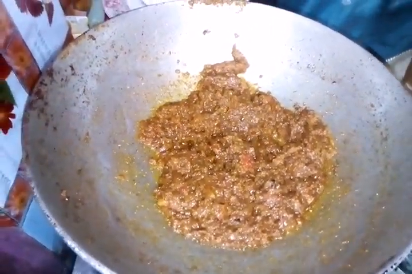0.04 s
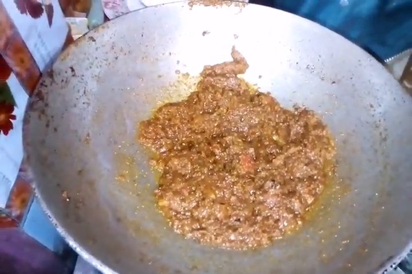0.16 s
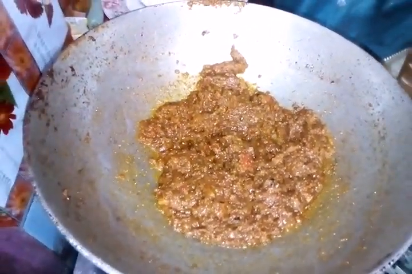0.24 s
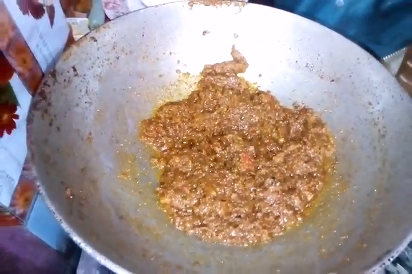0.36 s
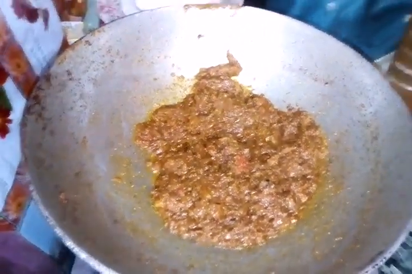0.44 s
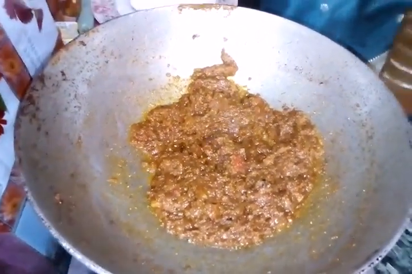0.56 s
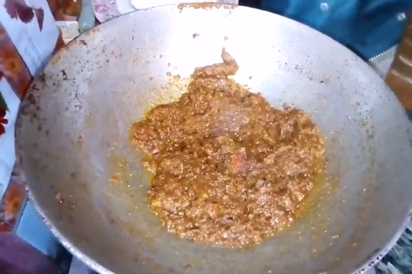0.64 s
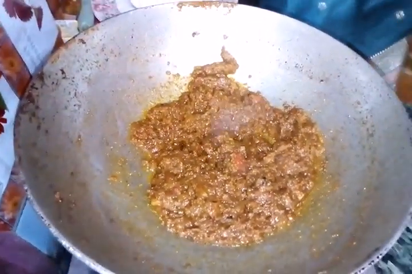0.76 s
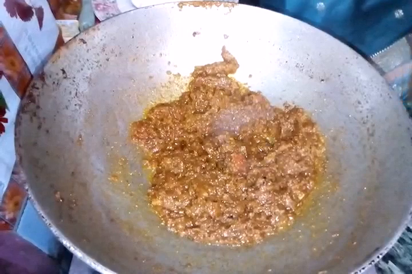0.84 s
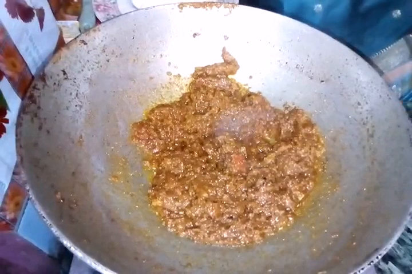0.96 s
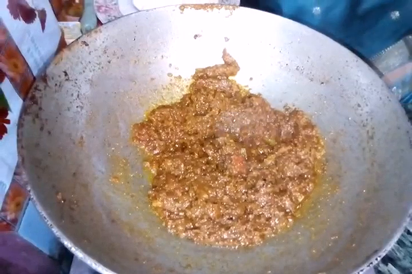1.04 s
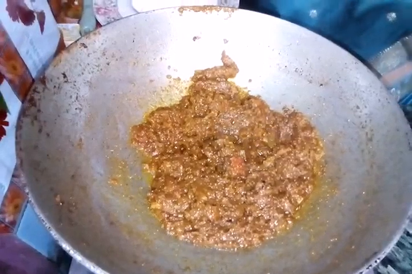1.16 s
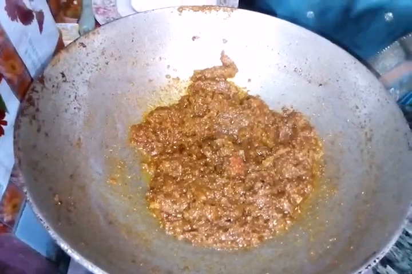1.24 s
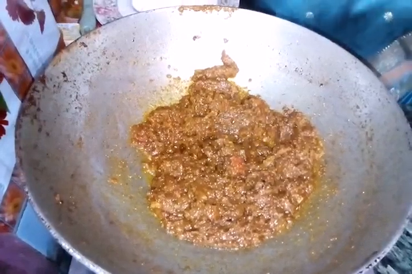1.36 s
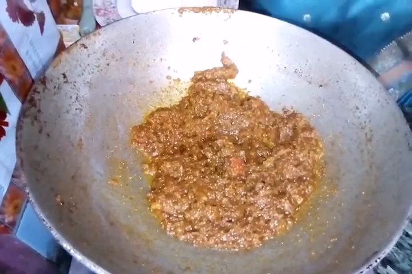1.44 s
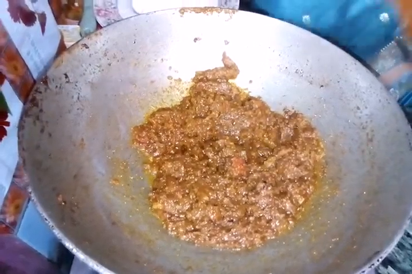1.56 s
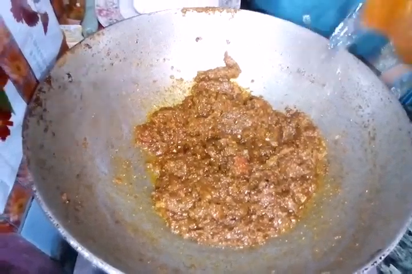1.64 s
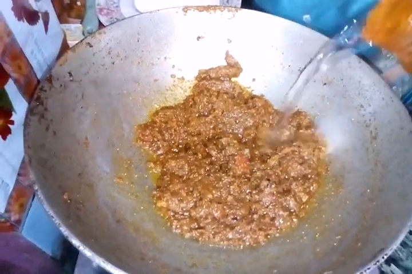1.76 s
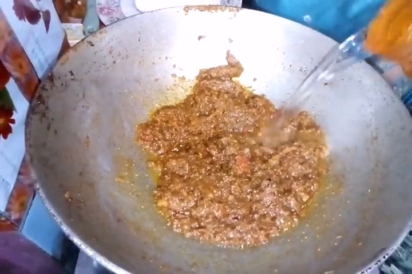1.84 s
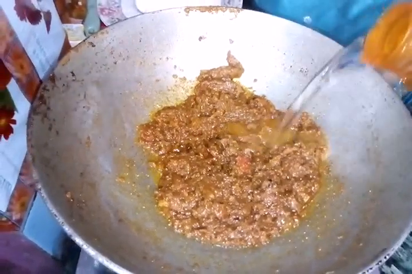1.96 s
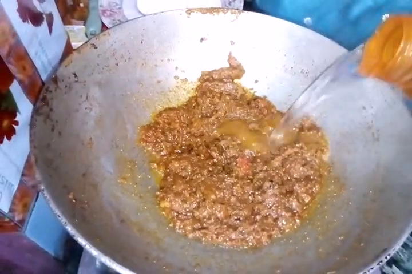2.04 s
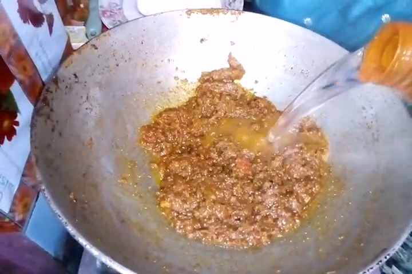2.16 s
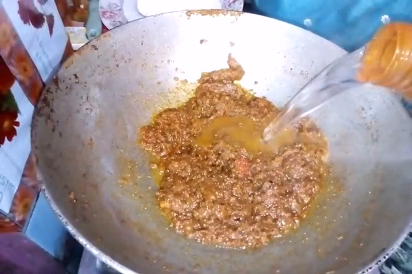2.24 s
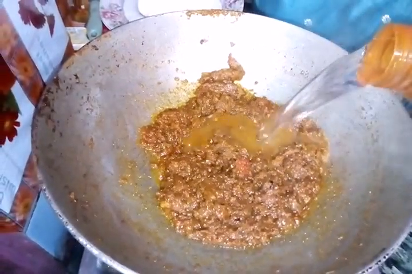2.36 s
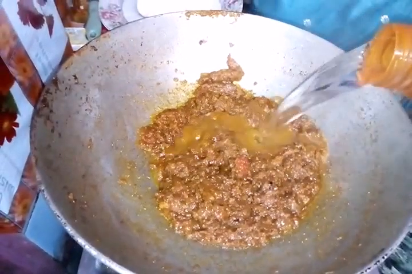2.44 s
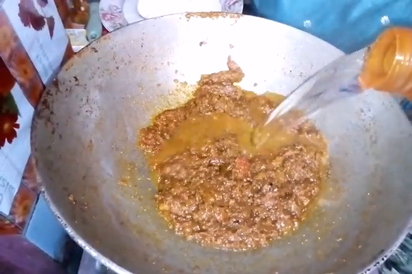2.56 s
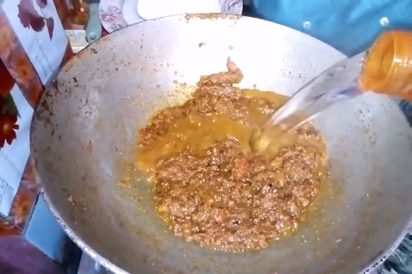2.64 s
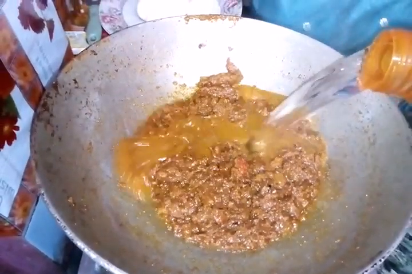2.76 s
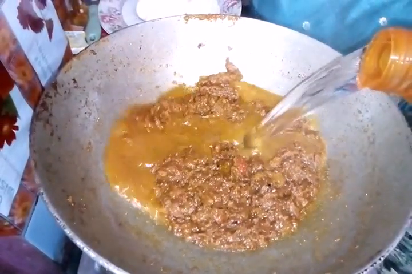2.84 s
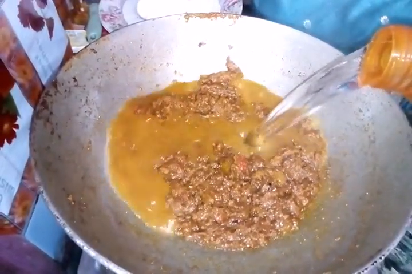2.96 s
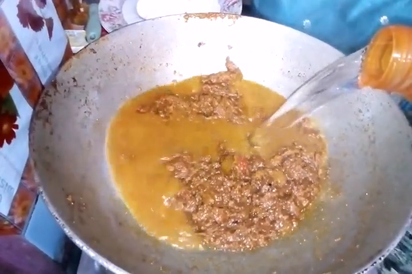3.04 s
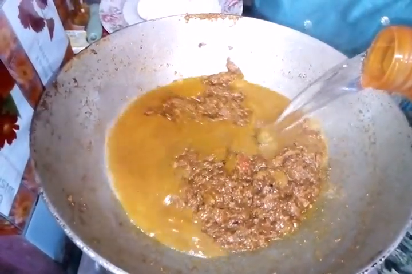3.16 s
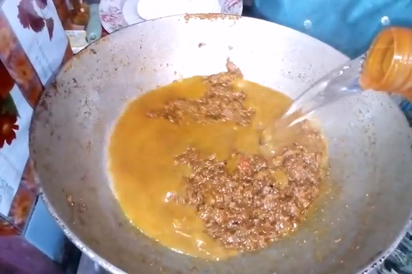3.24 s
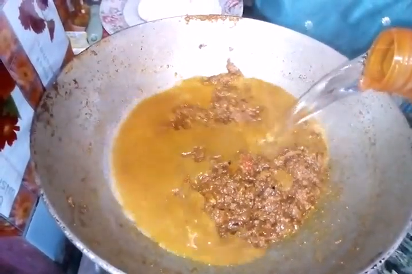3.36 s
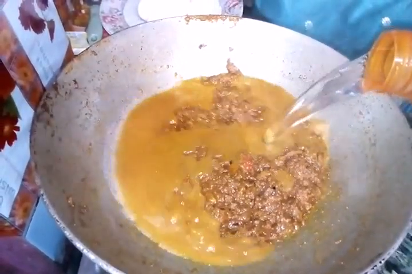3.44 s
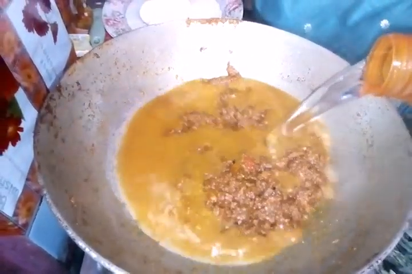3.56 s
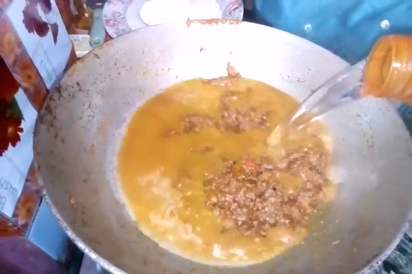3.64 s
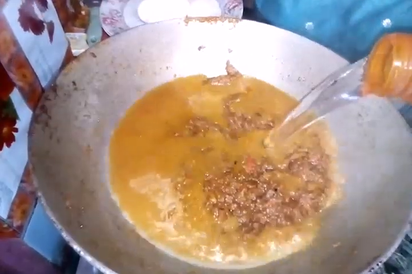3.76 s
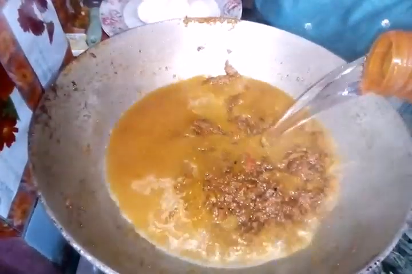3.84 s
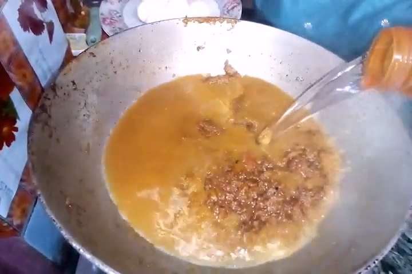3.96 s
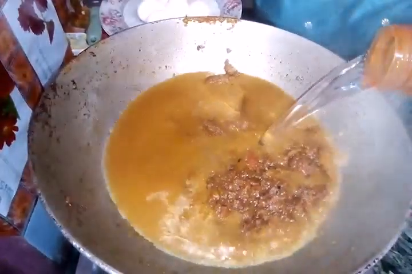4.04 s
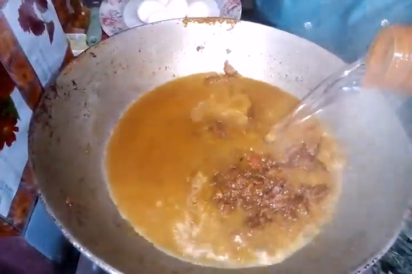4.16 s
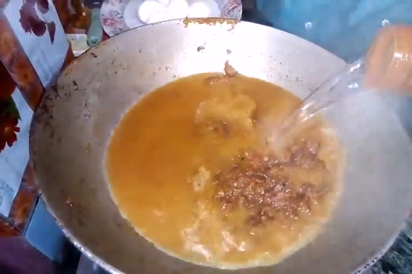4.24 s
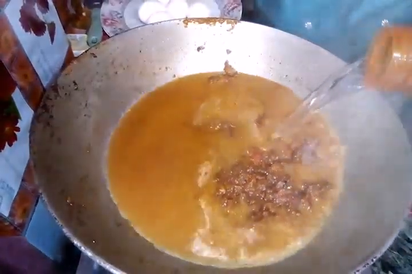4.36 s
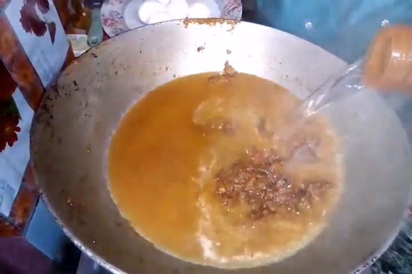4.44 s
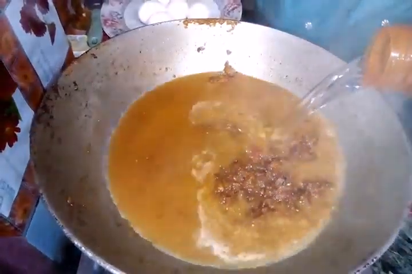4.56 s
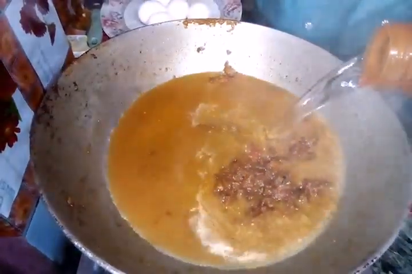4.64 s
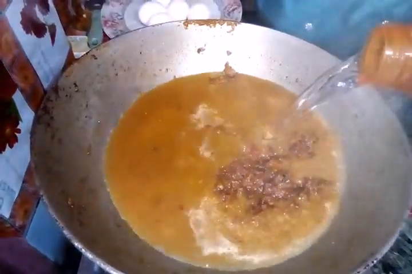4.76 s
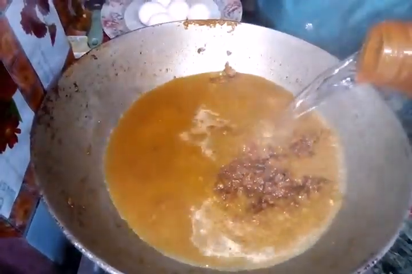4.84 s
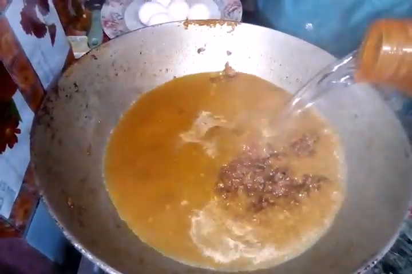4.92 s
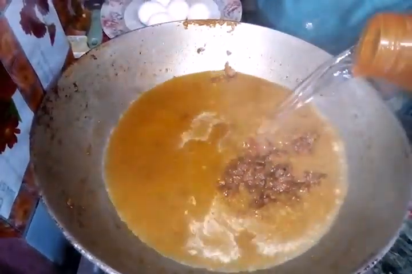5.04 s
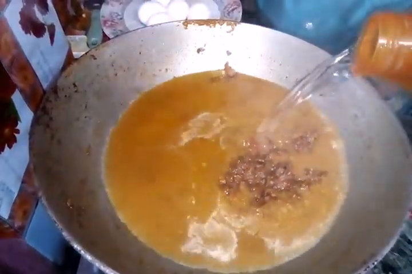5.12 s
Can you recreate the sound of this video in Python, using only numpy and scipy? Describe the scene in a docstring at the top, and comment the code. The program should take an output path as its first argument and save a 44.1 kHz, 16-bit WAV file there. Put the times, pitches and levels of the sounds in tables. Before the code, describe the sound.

Quiet oily frying with sharp little snaps over a faint gas flame, suddenly swamped by loud steaming hiss as water streams in.

```python
"""Water streams into a hot wide steel pan and flashes to steam: a loud dense hiss that deepens as the pool
boils. Before it, spice paste fries quietly: countless bursts of steam in the oil, each a short ring, a few with
a pop. Below lies the gas flame, low noise in narrow bands that swell and fade; under a loud hiss the low bands
dip to silence more often. Place: a kitchen whose near walls and hob add a short tail to the fine bursts; the
pan's bowl echoes the pops. At the microphone everything above 15.5 kHz is cut steeply."""
import sys
import numpy as np
from scipy import signal
from scipy.fft import rfft, irfft
from scipy.io import wavfile

SR = 44100
rng = np.random.default_rng(int(sys.argv[2]) if len(sys.argv) > 2 else 0)


def wav_record(signal):
    """Record a signal, one row per channel, as 16-bit PCM in the file named by sys.argv[1]."""
    frames = np.transpose(np.atleast_2d(signal))
    bounded = np.clip(frames, -1, 1)
    # unit amplitude maps onto the largest positive 16-bit level
    quanta = np.round(bounded * 32767).astype(np.int16)
    wavfile.write(sys.argv[1], SR, quanta)


N = 228743   # samples
TIME_S = np.arange(N) / SR


def from_db(db):
    """Amplitude gain of a level in dB."""
    return 10 ** (np.asarray(db) / 20)


def rms_one(x):
    """Scale to an RMS of 1."""
    return x / np.sqrt(np.mean(x ** 2) + 1e-20)


def in_time(rows):
    """Columns of dB as gains over time; silent outside the table."""
    s, *columns = np.transpose(rows)
    return [from_db(np.interp(TIME_S, s, column, left=-200, right=-200)) for column in columns]


def drift(rate_hz):
    """Slow chance: noise through a double one-pole low-pass, spread 1."""
    r = np.exp(-2 * np.pi * rate_hz / SR)
    noise = rng.standard_normal(N + SR)
    settled = signal.lfilter([1], [1, -2 * r, r * r], noise)[SR:]
    return rms_one(settled)


def colour(x, spectrum):
    """Causal (minimum-phase) filter with the given dB per Hz, made by folding the cepstrum."""
    hz, db = np.transpose(spectrum)
    grid_hz = np.maximum(np.fft.rfftfreq(4096, 1 / SR), 1)
    log_gain = np.interp(np.log(grid_hz), np.log(hz), db) * np.log(10) / 20
    cepstrum = irfft(log_gain)
    cepstrum[1:2048] *= 2
    cepstrum[2049:] = 0
    impulse_response = irfft(np.exp(rfft(cepstrum)))
    return signal.fftconvolve(x, impulse_response)[:N]


def ring(clicks, hz, cycles):
    """A vapour pocket rings as a resonance that falls 60 dB in the given number of cycles."""
    r = from_db(-60 * hz / (cycles * SR))
    w = 2 * np.pi * hz / SR
    return signal.lfilter([1, 0, -1], [1, -2 * r * np.cos(w), r * r], clicks + 1e-18)


KITCHEN_T60_S, KITCHEN_DB = 0.08, -0.5   # decay time; energy of the tail against the direct sound


def kitchen(x):
    """Near walls and hob return a short dense tail: decaying noise that starts after 2 ms."""
    t = np.arange(SR // 4) / SR
    tail = rng.standard_normal(len(t)) * from_db(-60 * t / KITCHEN_T60_S) * (t > .002)
    tail = tail / np.sqrt(np.sum(tail ** 2))
    return x + from_db(KITCHEN_DB) * signal.fftconvolve(x, tail)[:N]


def bursts(per_s, spread_db, clump_db, cycles, low_hz, high_hz, count=20):
    """Random ringing bursts of uneven size in clumps; each of six spots in the pan has its own room tail."""
    sizes = from_db(spread_db * np.minimum(rng.exponential(1, N), 4)) * rng.choice([-1, 1], N)
    surge = from_db(clump_db * (drift(66) + drift(8.0)))
    happens = rng.random(N) < np.minimum(per_s / SR, .9)
    clicks = sizes * surge * happens
    pitches = np.geomspace(low_hz, high_hz, count)
    dealt, spot = rng.integers(0, count, N), rng.integers(0, 6, N)
    out = 0
    for here in range(6):
        dry_spot = 0
        for k, hz in enumerate(pitches):
            own_clicks = clicks * (dealt == k) * (spot == here)
            # this weight makes the sum flat per Hz
            dry_spot = dry_spot + hz ** 1.5 / SR * ring(own_clicks, hz, cycles)
        out = out + kitchen(dry_spot)
    return out


# Level of the frying paste: (time [s], level [dB])
FRYING_LEVEL = [(0.0, -32.5), (0.8, -33.5), (1.86, -34)]
# Spectrum of bursts in the oil, also used for the pops: (frequency [Hz], level per Hz [dB])
OIL_COLOUR = [(180, -27), (300, -33), (918, -8.5), (1010, -10), (1430, -12.5), (1690, -11), (1860, -17),
              (2420, -8), (4380, -8), (6090, -3), (6830, -5), (8320, -19.5), (9980, -19), (13200, -35),
              (15300, -19.5)]


def frying():
    """Countless small steam bursts in the oil, summed and coloured."""
    level, = in_time(FRYING_LEVEL)
    grains = bursts(14000, spread_db=2.5, clump_db=0.67, cycles=13.2, low_hz=315, high_hz=14300)
    return level * rms_one(colour(grains, OIL_COLOUR))


RUMBLE_START_DB, RUMBLE_SETTLE_S = 3.5, 0.35   # louder at first, then settling
DROPOUT_RATE_HZ, DROPOUT_FADE_S = 10.9, .04   # corner of the chance that sets the dropouts; smoothing window
DROPOUT_SHARED = 0.32   # share of that chance common to all bands
DROPOUT_RELIEF = 0.31   # share of the gained dB that holds the dropouts off
# Deep, middle and upper part of the low noise: (level before the water, without the louder start [dB], # hiss
# level at which its bands are silent half the time [dB], hiss range from rarely to mostly silent [dB], # gain
# once the water boils [dB])
FLAME_PARTS = [(-57.5, -18.5, 0.5, -1.5), (-57, -20.5, 1, 5.5), (-62, -23, 3.5, 14)]
# Band edges, one row for each part: (edge [Hz], ...)
FLAME_BAND_EDGES = [
    [24, 60, 110, 170],
    [170, 270, 380],
    [380, 490, 600, 720],
]
# Spectrum of the flame: (frequency [Hz], level per Hz [dB])
FLAME_COLOUR = [(18, -46), (30, -22), (124, 6), (217, 4), (368, -2), (480, 4.5), (720, -1), (850, -38)]


def rumble():
    """Low noise in narrow bands: the flame swells and fades, and the bands dip to silence more often the louder
    the hiss."""
    s, hiss = np.transpose(WATER_LEVELS)[:2]
    hiss_db = np.interp(TIME_S, s, hiss)
    boils = np.clip((TIME_S - s[0]) / 0.69, 0, 1)   # 0 before the water, 1 after 0.69 s of it
    settling_db = RUMBLE_START_DB * np.exp(-TIME_S / RUMBLE_SETTLE_S)
    fade = np.hanning(round(DROPOUT_FADE_S * SR))
    fade = fade / fade.sum()
    together, out = drift(DROPOUT_RATE_HZ), 0
    for (level_db, half_db, range_db, boil_db), edges in zip(FLAME_PARTS, FLAME_BAND_EDGES):
        gained_db = boil_db * boils
        threshold = (hiss_db - DROPOUT_RELIEF * gained_db - half_db) / range_db
        patchy = 0
        for pair in zip(edges, edges[1:]):
            band_filter = signal.butter(5, pair, "band", fs=SR, output="sos")
            band = signal.sosfilt(band_filter, rng.standard_normal(N))
            alone = drift(DROPOUT_RATE_HZ)
            luck = np.sqrt(DROPOUT_SHARED) * together + np.sqrt(1 - DROPOUT_SHARED) * alone
            present = signal.fftconvolve(luck > threshold, fade, "same")
            swell = from_db(4.24 * drift(6.8))
            patchy = patchy + swell * present * band
        heard = colour(patchy, FLAME_COLOUR)
        before_water = heard[:round(s[0] * SR)]
        out = out + from_db(level_db + gained_db + settling_db) * heard / np.std(before_water)
    return out


FOCUS_HZ = (4300, 7800)   # band that the bowl returns
# Walls of the bowl: (delay [s], level [dB])
BOWL_ECHOES = [(.0004, -6), (.0034, -3), (.0068, -11)]


def bowl(x):
    """The curved pan sends the bright part of each burst back a few times, with alternating sign."""
    out = x.copy()
    focus = signal.butter(2, FOCUS_HZ, "band", fs=SR, output="sos")
    bright = signal.sosfilt(focus, x + 1e-18)
    for k, (delay_s, db) in enumerate(BOWL_ECHOES):
        lag = round(delay_s * SR)
        out[lag:] += (-1) ** k * from_db(db) * bright[:-lag]
    return out


SMALL_POPS = 20   # weaker bursts at random moments until the water arrives
SMALL_POP_DB, SMALL_POP_HZ, SMALL_SIZE_DB, SMALL_SPUTTER_DB = -29, 5900, -9, -19   # averages


def small_pops():
    """Weaker bursts drawn at random, in rows like those of the loud ones."""
    spread = rng.standard_normal((SMALL_POPS, 4)) * [2.5, 900, 5, 2.7]
    s = rng.uniform(0, WATER_LEVELS[0][0], (SMALL_POPS, 1))
    return np.hstack([s, spread + [SMALL_POP_DB, SMALL_POP_HZ, SMALL_SIZE_DB, SMALL_SPUTTER_DB]])


# Loud bursts in the oil, strengths before colouring: (time [s], strength [dB], pitch [Hz],
# size as the lower knock against the strength [dB], sputter against the strength [dB])
LOUD_POPS = [(0.0062, -12, 5600, -10, -13.5), (0.0233, -17.5, 6300, -13, -16), (0.065, -21, 6000, -13, -20),
             (0.1056, -16, 5600, -18, -20), (0.1312, -15.5, 5500, -13, -18), (0.1596, -22, 4970, -10, -18),
             (0.2532, -20.5, 5700, -14, -8.5), (0.2625, -15.5, 6000, -1, -30),
             (0.3277, -19, 6200, -14, -15), (0.3503, -15, 9000, -20, -25), (0.3693, -18, 6000, -13, -22),
             (0.3757, -12, 6400, -16, -17), (0.4568, -17, 6650, -6, -18), (0.4601, -16, 6300, -12, -20),
             (0.4671, -17, 5300, -4, -20), (0.4711, -25, 6500, -15, -24), (0.4852, -6, 10000, -24, -34),
             (0.4946, -12, 8500, -18, -20), (0.5127, -14.5, 6000, -14, -11.5), (0.5933, -17, 5100, -8, -24),
             (0.6035, -16, 5370, 0, -26), (0.6169, -8.5, 6200, -5.5, -23), (0.6626, -6, 10000, -24, -30),
             (0.6751, -21, 5400, 0, -22), (0.7078, -20, 5900, 0, -18), (0.722, -22, 5200, -6, -22),
             (0.7523, -11, 5600, -4, -22), (0.8367, -22, 6200, -8, -26), (0.8549, -18, 5800, -22, -22),
             (0.8929, -21, 5300, -12, -18), (0.9159, -15.5, 5600, -6, -19), (0.9236, -19, 5000, -5, -24),
             (0.9345, -18, 5500, -11, -11), (0.9435, -18, 6300, -13, -22), (1.1131, -17, 5600, -6, -15),
             (1.1205, -19, 6400, -16, -22), (1.1584, -22.5, 5500, 2, -20), (1.1654, -24, 5800, -9, -22),
             (1.2056, -16.5, 5500, -12, -12), (1.2367, -14, 6000, -7, -20), (1.2952, -20, 6200, -7, -18),
             (1.3517, -22, 7000, -15, -23), (1.3744, -21, 5070, -8, -23), (1.435, -23, 5600, -9, -22),
             (1.4733, -8.5, 5370, -21, -18.5), (1.4827, -14, 5230, -16, -20), (1.5442, -19, 7100, -16, -14),
             (1.5572, -20, 5970, -17, -20), (1.5723, -13, 5500, 1.5, -21), (1.593, -22, 5000, -6, -24),
             (1.6021, -11.5, 7800, -14, -24), (1.6571, -17, 5830, -16, -11), (1.6818, -21, 5800, -11, -22),
             (1.6922, -19, 5800, -10, -22), (1.7289, -14, 7400, -17, -20), (1.7418, -22, 5200, -1, -21),
             (1.7887, -22, 5900, -19.5, -20)]


def pops():
    """Each burst is a snap at its own pitch that the bowl returns, a lower knock by size and a short sputter."""
    s, peak_db, hz, size_db, sputter_db = np.vstack([LOUD_POPS, small_pops()]).T
    at = (s * SR).astype(int)
    sign = rng.choice([-1, 1], len(s))
    snap, big, spit = np.zeros((3, N))
    for i, pitch, height in zip(at, hz, sign * from_db(peak_db)):
        click = height * (np.arange(400) == 0)
        snap[i:i + 400] += ring(click, pitch, 8.0)
    big[at] = sign * from_db(peak_db + size_db)
    spit[at] = from_db(peak_db + sputter_db)
    fade = np.exp(-1 / (0.0077 * SR))   # the sputter dies away with a time constant of 7.7 ms
    sputter = signal.lfilter([1], [1, -fade], spit + 1e-18) * rng.standard_normal(N)
    together = bowl(snap) + ring(big, 3300, 8.1) + ring(sputter, 6060, 4.5)
    return from_db(2) * colour(together, OIL_COLOUR)


LOW_CUT_HZ = 660   # lowest pitch the water keeps; below it the water is cut steeply
# Water on the hot pan, before the low cut:
# (time [s], fine hiss [dB], larger bubbles before a 2 dB cut [dB], froth [dB])
WATER_LEVELS = [(1.8, -50, -51, -67), (1.82, -36, -55, -68), (1.84, -23, -38, -68), (1.87, -20, -36, -48),
                (1.97, -20.5, -36, -47), (2.1, -19.5, -42, -44), (2.38, -20.5, -31, -40),
                (2.72, -19.5, -30.5, -39), (2.95, -20, -24.5, -36.5), (3.151, -17.5, -23.5, -36.5),
                (3.45, -18.5, -23, -38), (3.75, -18, -24.5, -39), (3.85, -16, -25, -40),
                (4.3, -17, -26, -39), (4.65, -18.5, -23.5, -40), (5.03, -20, -25, -40.5),
                (5.19, -21, -24, -42)]
# Spectra of fine hiss, larger bubbles and froth: (frequency [Hz], level per Hz [dB])
STEAM_COLOUR = [(1180, -22), (2000, -26), (2310, -11.5), (2600, -17.5), (3360, -10.5), (3820, -14.5),
                (4650, -7), (5280, -8), (5800, -5), (6300, 0.5), (6700, -4.5), (7400, -12.5), (7940, -17.5),
                (8950, -23.5), (9900, -22), (11000, -27), (12300, -34.5), (13500, -43), (14500, -24.5),
                (15300, -25.5)]
LARGE_BUBBLE_COLOUR = [(1500, -15), (2000, -3.5), (2350, 3), (2700, 5), (3300, 6.5), (4300, 2), (5500, -5),
                       (8000, -21)]
LOW_FROTH_COLOUR = [(360, -48), (620, 0), (747, 4), (816, 4.5), (1040, 2.5), (1240, 8), (1520, 1),
                    (1710, 8.5), (2000, -6), (2600, -53), (4400, -120)]


def boiling():
    """Water flashing to steam: fine hiss, larger bubbles as the pool grows, low froth."""
    hiss_level, bubble_level, froth_level = in_time(WATER_LEVELS)
    hiss = bursts(24000, spread_db=3.0, clump_db=0.58, cycles=26.3, low_hz=1994, high_hz=15850)
    bubbles = bursts(6000, spread_db=-3.5, clump_db=1.0, cycles=11.5, low_hz=1673, high_hz=7000, count=10)
    froth = bursts(1200, spread_db=0.0, clump_db=-0.76, cycles=40.0, low_hz=565.6, high_hz=2230, count=24)
    water = hiss_level * rms_one(colour(hiss, STEAM_COLOUR))
    water += bubble_level * from_db(-2.0) * rms_one(colour(bubbles, LARGE_BUBBLE_COLOUR))
    water += froth_level * rms_one(colour(froth, LOW_FROTH_COLOUR))
    low_cut = signal.butter(14, LOW_CUT_HZ, "high", fs=SR, output="sos")
    return signal.sosfilt(low_cut, water)


def scene():
    """Paste, flame, pops and water in one channel."""
    return (frying() + rumble() + pops() + boiling())[None]


CUTOFF_HZ = 15500


def record(dry):
    """At the microphone the top is cut steeply, by an elliptic low-pass."""
    top_cut = signal.ellip(12, .5, 80, CUTOFF_HZ, fs=SR, output="sos")
    return signal.sosfilt(top_cut, dry)


dry = scene()
out = record(dry)
wav_record(out)
```